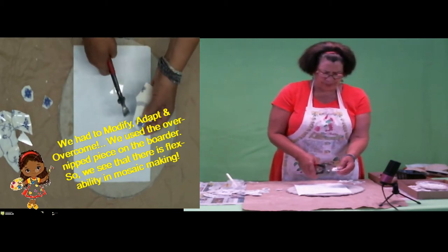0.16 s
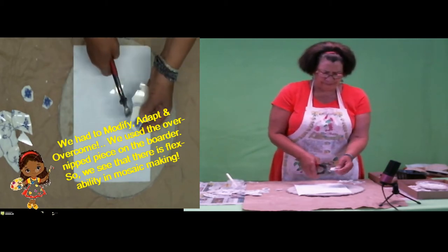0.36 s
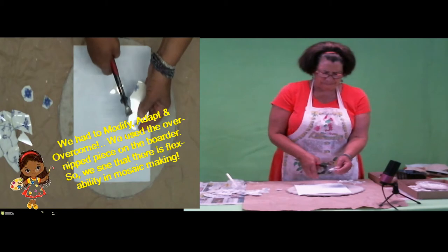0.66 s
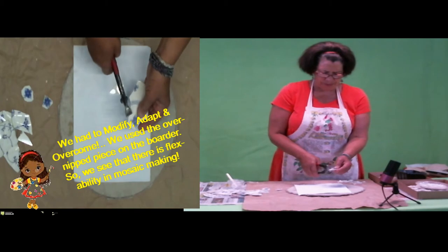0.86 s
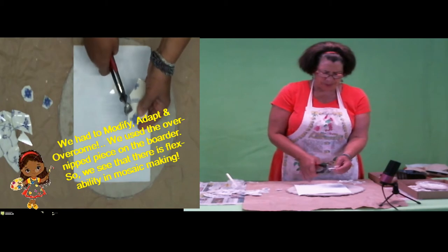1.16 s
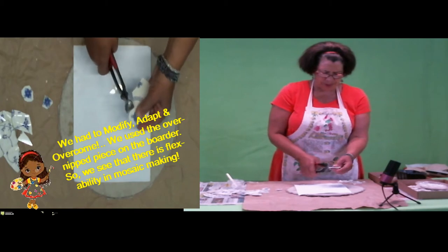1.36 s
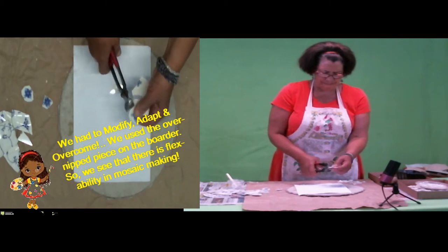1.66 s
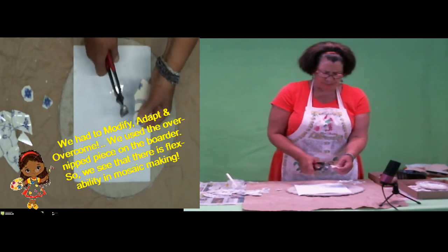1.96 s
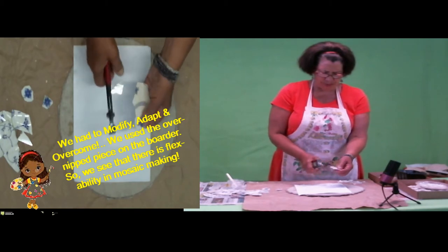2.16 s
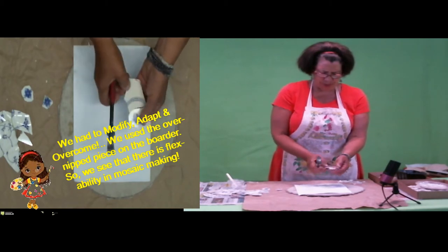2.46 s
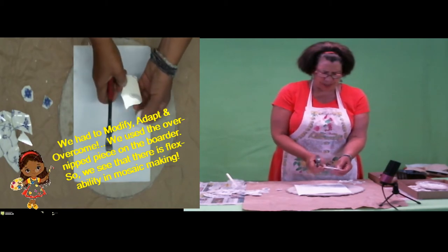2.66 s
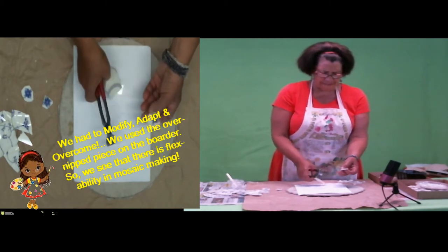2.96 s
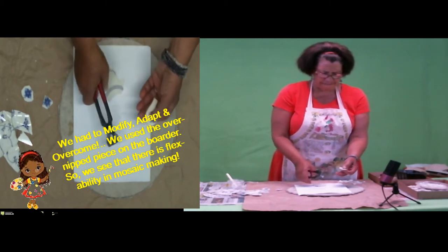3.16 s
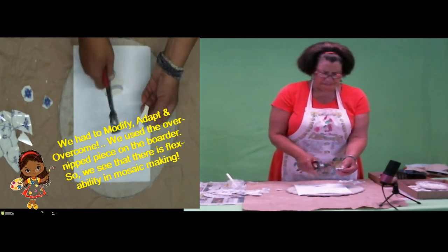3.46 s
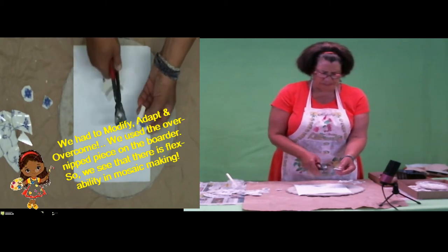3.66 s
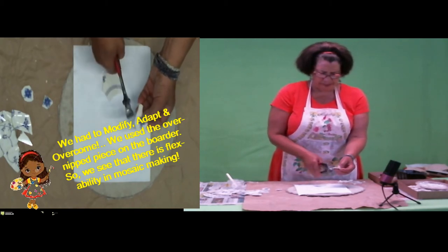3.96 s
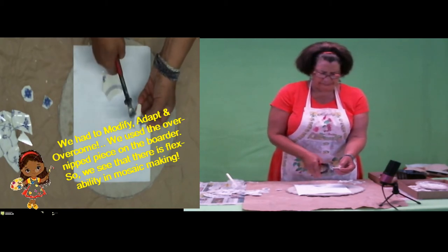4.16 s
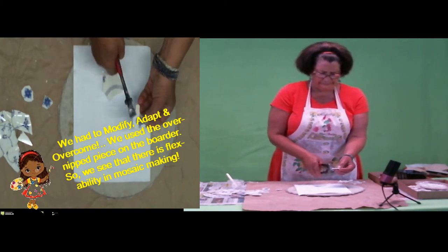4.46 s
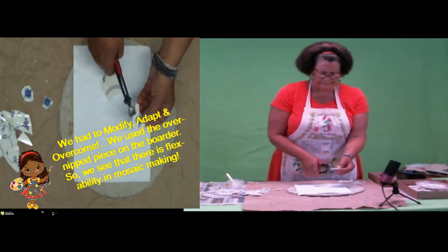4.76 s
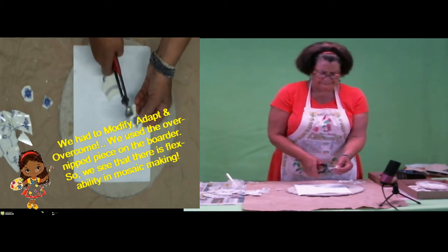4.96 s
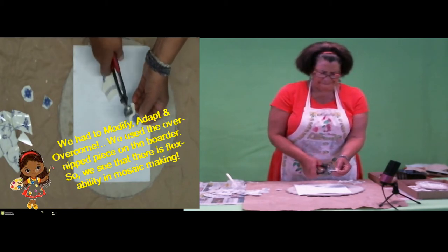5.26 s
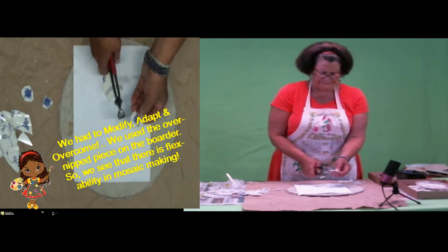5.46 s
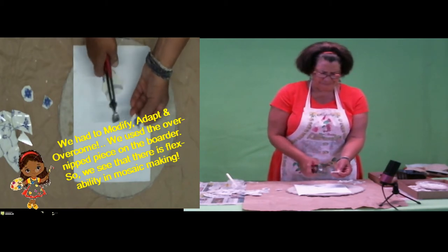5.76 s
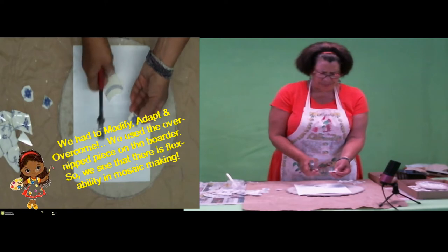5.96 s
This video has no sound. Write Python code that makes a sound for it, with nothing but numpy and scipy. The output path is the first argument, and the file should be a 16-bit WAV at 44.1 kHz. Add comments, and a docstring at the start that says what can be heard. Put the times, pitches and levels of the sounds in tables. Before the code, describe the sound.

Steel hand nippers work on china, heard close up in a small room. Faint ticks and a tiny scrape come at about 0.4 and 0.8 seconds. From 1.4 seconds the jaws grind with a thin, high squeak and dense crackling, ending in a loud snap at 1.8 seconds with a steel clink, a dull table bump and crumbs scattering on paper. Small clicks follow until 2.5 seconds. At 3.2 seconds a second sharp snap briefly rings a plate, followed by light clinks, chips and soft low bumps. A small gritty bite sounds at 4.6 seconds. More squeaky crackling starts at 5.1 seconds and breaks into a third loud snap at 5.5 seconds, with a bump and falling bits ticking until 6 seconds. Underneath, very faint room noise throbs about nine times a second, swelling at each big snap and sinking away.

```python
"""Hand nippers nibble and snap pieces of china over a sheet of paper in a small room.
The jaws grind with grit and a climbing squeak, and the glaze cracks in bursts that ring the gripped
piece. As pieces break off, the steel tool clinks, dull bumps pass through the table and crumbs
scatter on the paper; one knock rings a plate. Behind it all a soft room noise throbs about nine
times a second, swelling at each big snap and sinking away again."""
import sys
import numpy as np
from scipy import signal
from scipy.io import wavfile
from scipy.ndimage import uniform_filter1d, minimum_filter1d

SR = 44100
rng = np.random.default_rng(int(sys.argv[2]) if len(sys.argv) > 2 else 0)


def master_out(mix):
    """Clip the mix to full scale and print it as 16-bit PCM to the path in sys.argv[1]."""
    frames = np.transpose(np.atleast_2d(mix))
    ceiling = np.clip(frames, -1, 1)
    pcm = np.round(ceiling * 32767).astype(np.int16)
    wavfile.write(sys.argv[1], SR, pcm)


N = 269671

# Room noise bands: low_hz, high_hz, base_dip_db, throb_share, patchiness_db,
# crest_length (-1 short to 1 long), top_db, sink_db, sink_exponent, floor_db
NOISE_BANDS = [(200, 430, 20, .1, 4, -0.04, -68.5, 25, 1.6, -93.5),
               (283, 540, 19.5, .1, 3.5, -0.11, -64.5, 19.5, 1.4, -88),
               (482, 570, 14, 0.26, 6.5, -0.13, -62, 19, 0.98, -92),
               (604, 910, 9, 0.76, 4.5, -0.081, -60.5, 9, 1.5, -83),
               (930, 1650, 4.5, 0.59, 3.5, 0.24, -60, 5.5, 1.6, -80.5),
               (1680, 2900, 1, 0.48, 3.5, .3, -61, 4, 1.5, -79),
               (2990, 4800, -2, .7, 3, .4, -64, 1.5, 2.2, -76),
               (4950, 24000, -1, .7, 2.5, 0.2, -65, 5.5, .9, -78)]
# Room noise swells: start_s, level_db, hump_hz, hump_db, sink_pace_per_s, first_depth_db,
# depth_growth_db_per_s, extra_crest_length
NOISE_SWELLS = [(-.05, -1.97, 520, 7.5, 1.07, 5.5, 8, 0.62), (1.839, -0.3, 370, 12.5, .95, 3.5, -1, -.25),
                (3.23, -2, 798, 11.5, 0.94, 3.5, 11.5, 0.41), (5.469, -1.9, 305, 10.5, 0.68, 0, 8.5, .05)]
# Tone of the room noise: frequency_hz, gain_db
NOISE_EQ = [(200, -0.5), (1800, 3), (3400, 1), (4500, -4), (4900, -8), (6000, -5.5), (8100, -8),
            (12000, -11.5), (16000, -24.5)]
# A wavering hum: pitch_hz, width_hz, level_db
ROOM_HUM = (355, 20, -77.5)
# Steady rumble: low_hz, high_hz, level_db
RUMBLE_BANDS = [(30, 49, -95.5), (117, 280, -83)]
# Cracks in the china: start_s, level_db, ring_hz, ring_db, middle_db, treble_db
# (the last three are sends, relative to level_db)
CRACK_HITS = [(0.3792, -39, 6870, -4.5, -42, -3.5), (0.7672, -44, 7000, -4.5, -10, -6),
              (0.8286, -37.5, 7070, -1.5, -7.5, -0.5), (1.4457, -18.5, 11150, 2, -60, 2),
              (1.4603, -16.5, 11130, 8.5, -60, -15), (1.497, -16.5, 11200, -5, -50, -11),
              (1.5176, -23, 11400, 1, -51, -15), (1.5252, -19, 7570, -1, -42, -14),
              (1.5351, -18.5, 11320, -0.5, -60, -10), (1.5513, -25, 5640, -2, -60, 4),
              (1.576, -30.5, 8400, 7.5, -42, -10), (1.5941, -21, 3220, -13, -54, -3),
              (1.6016, -16, 9700, -22, -37, 2), (1.616, -7.5, 9360, -7, -36, -20),
              (1.6308, -1, 5260, -11.5, -69, -5.5), (1.6835, -1, 7300, -3, -50, -0.5),
              (1.7332, -23, 9700, -7, -41, -13), (1.7939, -13.5, 7200, -9, -26, 6),
              (1.799, -4, 7040, -5, -23.5, 2), (1.814, -21.5, 7350, -22, 4, 6),
              (1.821, -8.5, 7500, -11, -31, 3), (1.83, 2.5, 10000, -26, -7, 0),
              (1.833, 9.5, 10350, -24, -19, -25), (1.925, -13.5, 4330, -19, -19.5, -7),
              (1.9518, -17.5, 5800, -19, -36, -2), (1.995, -3.5, 2530, -9.5, -16, -3.5),
              (2.0976, -25, 3400, -3, -4, -2), (2.144, -34, 3030, -3, -14, 2),
              (2.168, -25, 9350, -14, -17, -1), (2.2364, -34, 3180, -7, -29.5, -2),
              (2.3884, -39, 4020, -21.5, -19, -8), (3.0754, -21, 9950, -11, -22.5, -27.5),
              (3.217, 4.5, 3160, -1, -12, -3.5), (3.2206, 4, 3280, -6, -9.5, -19),
              (3.23, -7.5, 3540, 6, -1, -20), (3.4471, -37, 3380, -8, -10, -5),
              (4.594, -36.5, 7550, -5.5, -38, -4.5), (4.6318, -29, 7650, -3.5, -46.5, -6.5),
              (5.1417, -37, 6370, -10, -25.5, -10.5), (5.1703, -28, 6580, -9.5, -31.5, -5.5),
              (5.1822, -15.5, 6760, -3, -42.5, -6), (5.1948, -17, 6860, 2, -41, -20),
              (5.264, -31.5, 7100, 9, -58.5, -26.5), (5.3491, -24, 7060, 13, -47, 8),
              (5.458, 11.5, 6470, -30, -19, -28), (5.4636, -2, 6700, -13, -7.5, -0.5),
              (5.4668, 0.5, 6470, -5.5, -25, -29), (5.539, -18.5, 7100, -13, -29, -4),
              (5.553, -20, 3600, -6.5, -26, -1), (5.604, -11.5, 4800, -8.5, -16, -18),
              (5.6532, -20, 5230, -12, -32, -1.5), (5.747, -35, 6540, -23, -23, 1),
              (5.814, -24.5, 6800, -25, -11, -14), (5.8597, -34, 5300, -7, -5.5, -2),
              (5.91, -38, 2600, -18, -7.5, -15), (6.0344, -35, 5530, -16.5, -22.5, -1)]
# Tone of a crack's core: frequency_hz, gain_db
CRACK_EQ = [(1350, -37), (2300, -15), (3780, -0.5), (4540, -8.5), (5200, -1), (6840, -9), (7450, -4.5),
            (9000, -7), (11700, -41), (19800, -120)]
# Modes of the gripped china: pitch_hz, gain_db, t60_s
CHINA_MODES = [(2818, -0.5, 0.01), (3255, 1.5, 0.027), (5550, -3.5, 0.05), (7120, -6, 0.013),
               (10100, -3.5, 0.04), (10500, -3.5, 0.011)]
# Grinding of the jaws, one envelope per bite: time_s, level_db
BITE_ENVELOPES = [
    [(.8, -89), (.84, -52.5), (.885, -71)],
    [(.885, -66), (.92, -65), (.97, -90)],
    [(1.27, -66.5), (1.36, -74), (1.43, -62.5), (1.46, -48), (1.55, -45), (1.6, -53), (1.65, -38.5),
     (1.71, -39.5), (1.8, -56)],
    [(4.5, -74), (4.57, -71.5), (4.64, -51), (4.67, -68), (4.71, -78.5)],
    [(5.12, -76), (5.17, -61), (5.21, -43.5), (5.25, -74), (5.3, -56.5), (5.34, -72), (5.37, -63.5),
     (5.46, -65)],
]
# Squeak of each bite: start_hz, climb_hz_per_s, gain_db (relative to the envelope)
BITE_SQUEAKS = [(7100, 490, -6), (10350, 30, 5.5), (10870, 1500, -6), (7650, 1300, 6), (7000, 2000, 7)]
# Partials of the squeak: pitch_ratio, gain_db
SQUEAK_TONES = [(0.52, -15), (1.0, 0), (1.7, -12.5), (2.0, -11.5)]
# Tone of the grit: frequency_hz, gain_db
GRIT_EQ = [(1530, -45), (2600, -20.5), (3290, -6.5), (4530, -20.5), (4890, -2), (6140, -14.5), (7420, 3),
           (9330, -5), (11500, -11.5), (16000, -20)]
# Dull bumps through the table: start_s, level_db, pitch_hz, t60_s
TABLE_BUMPS = [(1.828, -30.5, 320, 0.099), (1.833, -27, 448, 0.051), (3.3, -48.5, 54.4, 0.37),
               (3.45, -60.5, 45, .2), (3.55, -62, 50.1, 0.24), (3.72, -66, 80, 0.11),
               (4.65, -59, 150, 0.12), (4.758, -55, 150, .13), (5.461, -25.5, 276.2, 0.063),
               (5.464, -30, 433, 0.058), (5.462, -40.5, 171, 0.15), (5.535, -39, 59, 0.44),
               (5.658, -50, 48.7, 0.59), (5.8, -57, 60, 0.27)]
# Clinks of the tool: start_s, level_db, centre_hz, spread_octaves
TOOL_HITS = [(1.829, -1, 9930, 0.15), (2.1634, -28.5, 9800, 0.1), (2.184, -17, 6420, 0.081),
             (2.474, -38.5, 7230, 0.5), (2.4828, -27, 7580, 0.8), (2.493, -26, 7530, 0.18),
             (3.0772, -25, 9640, 0.6), (3.266, -25.5, 9800, 0.1), (3.29, -20, 6460, 0.05),
             (5.8136, -38, 5370, 0.5), (3.22, -11, 7160, 0.9)]
# Modes of the steel tool: pitch_hz, gain_db, t60_s
STEEL_MODES = [(5500, -15, 0.069), (5870, -11, 0.054), (6462, 0, 0.047), (7250, -4, .07),
               (8600, -15.5, .06), (9830, 1.5, 0.09), (13480, -6.5, 0.09)]
# Crumbs and shards landing on the paper: start_s, level_db, hold_s, fall_db_per_s
CRUMB_SHOWERS = [(1.83, -41, 0.13, 67), (3.223, -40.5, 0.074, 259), (5.455, -36, 0.015, 197),
                 (5.474, -45, .1, 57), (5.577, -40.5, 0.0074, 152), (5.59, -32, 0.015, 502)]
# Tone of the crumbs: frequency_hz, gain_db
CRUMB_EQ = [(530, -37), (900, -8), (1160, -22), (1980, -2), (2450, -7), (6420, -4.5), (15500, -14.5)]
# The rattling blow on the plate: start_s, drive_db, t60_s
PLATE_HIT = (3.2215, -7, 0.0099)
# Modes of the plate on the table: pitch_hz, gain_db, t60_s
PLATE_MODES = [(672, -6, 0.083), (802.3, -11.5, 0.13), (856, -9, 0.098), (1344, -7.5, .05),
               (1950, -12.5, 0.048), (2170, 0.5, 0.06), (3236.5, -0.5, 0.088), (3295, -7.5, 0.019),
               (3590, -7.5, 0.044), (3596, -6, 0.06), (6030, -7.5, 0.12), (4160, -9.5, 0.058),
               (4270, -1, .04), (5180, 1, 0.039)]
# Slaps off nearby surfaces: delay_s, gain_db
EARLY_ECHOES = [(.0085, -14), (.017, -26), (.026, -28)]
# Decay of the room's tail: frequency_hz, t60_s
TAIL_DECAY = [(300, 0.22), (1000, 0.092), (4000, 0.16), (10000, 0.12), (16000, 0.14)]

THROB_HZ, FIRST_CREST_S, MAX_DEPTH_DB = 9.375, .027, 23
LONGEST_CREST, CREST_LOSS_PER_DB = .75, 0.02   # deeper throbs have shorter crests
HUMP_OCTAVES, FLARE_DB, FLARE_S = .3, 4, .04
CRACK_T60_S, SCATTER_RISE_S = 0.013, .012
TAIL_DB, CUTOFF_HZ = -11.5, 16600


def amp(db):
    return 10 ** (np.asarray(db) / 20)


def unit(x):
    return x / np.sqrt(np.mean(x ** 2) + 1e-20)


def at_hz(curve, hz):
    points_hz, values = np.transpose(curve)
    return np.interp(np.log(hz), np.log(points_hz), values)


def add(out, start_s, x):
    i = round(start_s * SR)
    out[i:i + len(x)] += x[:N - i]


def band(x, low_hz, high_hz, order=2):
    sos = signal.butter(order, [low_hz, min(high_hz, .45 * SR)], "band", fs=SR, output="sos")
    return signal.sosfilt(sos, x)


def high_pass(x, hz):
    return signal.sosfilt(signal.butter(8, hz, "high", fs=SR, output="sos"), x)


def equalise(x, curve):
    """Twelve bands of alternating polarity, each at the curve's gain."""
    edges = np.geomspace(curve[0][0], curve[-1][0], num=13)
    return sum(amp(at_hz(curve, np.sqrt(low * high))) * band(x, low, high) * (-1) ** k
               for k, (low, high) in enumerate(zip(edges, edges[1:])))


def ring(drive, hz, t60):
    """One mode: a unit click starts a dying sine of height 1."""
    r, w = amp(-60 / (t60 * SR)), 2 * np.pi * hz / SR
    return signal.lfilter([0, np.sin(w)], [1, -2 * r * np.cos(w), r * r], drive + 1e-18)


def resonate(drive, modes, drive_db=0):
    return sum(amp(gain_db + drive_db) * ring(drive, hz, t60) for hz, gain_db, t60 in modes)


def drift(rate_hz):
    """Smooth random modulation, rms about 1."""
    r = np.exp(-80 * np.pi * rate_hz / SR)
    slow = signal.lfilter([1], [1, -2 * r, r * r], rng.standard_normal(N // 40 + 2002))[2000:]
    return np.interp(np.arange(N) / 40, np.arange(len(slow)), unit(slow))


def grains(per_s, spread_db):
    """Random clicks of very uneven size, rms 1."""
    sizes = amp(spread_db * np.minimum(rng.exponential(1, N), 4)) * rng.choice([-1, 1], N)
    return unit(sizes * (rng.random(N) < per_s / SR))


def room_noise():
    """A patchy noise bed swells, sinks and throbs with sharp dips, over a hum and a rumble."""
    t = np.arange(N) / SR
    swells = np.array(NOISE_SWELLS)
    current = swells[np.maximum(np.searchsorted(swells[:, 0], t) - 1, 0)]
    start_s, swell_db, hump_hz, hump_db, pace, first_db, growth, extra_crest = current.T
    age_s = np.maximum(t - start_s, 0)
    depth_db = np.minimum(first_db + growth * age_s, MAX_DEPTH_DB)
    swell_db = swell_db + FLARE_DB * np.exp(-age_s / FLARE_S)
    throb = np.cos(2 * np.pi * THROB_HZ * (t - FIRST_CREST_S))
    hum_hz, width_hz, hum_db = ROOM_HUM
    hum_level = amp(hum_db + 2.8 * drift(10) + 5.5 * throb)
    out = hum_level * unit(band(rng.standard_normal(N), hum_hz - width_hz / 2, hum_hz + width_hz / 2))
    for low_hz, high_hz, level_db in RUMBLE_BANDS:
        out += amp(level_db) * unit(band(rng.standard_normal(N), low_hz, high_hz))
    for low_hz, high_hz, dip_db, share, patchy_db, crest, top_db, sink_db, bend, floor_db in NOISE_BANDS:
        octaves_off = np.log2(np.sqrt(low_hz * high_hz) / hump_hz)
        boost_db = hump_db * np.exp(-.5 * (octaves_off / HUMP_OCTAVES) ** 2)
        level = amp(top_db + swell_db + boost_db - sink_db * (pace * age_s) ** bend) + amp(floor_db)
        crest_now = np.minimum(crest + extra_crest - CREST_LOSS_PER_DB * depth_db, LONGEST_CREST)
        dip = .5 - .5 * np.tanh(6 * (throb + crest_now))
        edges = np.geomspace(low_hz, high_hz, num=8)
        white = rng.standard_normal((2, N))
        strips = np.zeros(N)
        for k, (low, high) in enumerate(zip(edges, edges[1:])):   # each strip comes and goes on its own
            strip_db = at_hz(NOISE_EQ, np.sqrt(low * high)) + patchy_db * drift(9)
            strips += amp(strip_db) * band(white[k % 2], low, high, order=3)
        out += level * amp(-(dip_db + share * depth_db) * dip) * unit(strips)
    return out


def china_cracks():
    """Each crack is a tight noise burst that rings the gripped piece; deep ones reach lower."""
    t = np.arange(SR // 8) / SR
    attack = np.sin(np.pi / 2 * np.minimum(t / 0.0025, 1)) ** 2
    envelope = 0.55 * attack * amp(-60 * t / CRACK_T60_S)
    core, treble, middle, pings = np.zeros((4, N))
    for start_s, level_db, ring_hz, ring_db, middle_db, treble_db in CRACK_HITS:
        burst = amp(level_db) * envelope * rng.standard_normal(len(t))
        add(core, start_s, burst)
        add(treble, start_s, amp(treble_db) * burst)
        add(middle, start_s, amp(middle_db) * burst)
        ping = ring(burst, ring_hz, t60=.012) + ring(burst, 1.02 * ring_hz, t60=.012)
        add(pings, start_s, amp(level_db + ring_db) * ping / np.max(np.abs(ping)))
    snap = amp(11) * equalise(core, CRACK_EQ) + amp(11.5) * band(treble, 9000, 14200, order=4)
    ringing = pings + resonate(core, CHINA_MODES, drive_db=-26)
    body = amp(20) * band(middle, 900, 2700, order=4)
    return high_pass(snap + ringing, 2700) + body


def jaw_grind():
    """Dense grit keeps the china ringing, and a rough squeak climbs as the grip tightens."""
    grit = unit(equalise(grains(per_s=5000, spread_db=4), GRIT_EQ))
    grit = high_pass(grit + resonate(grit, CHINA_MODES, drive_db=-26.5), 2600)
    roughness = amp(4.7 * drift(40)) * (drift(320) + 1j * drift(320))   # shakes level and phase
    out, t = np.zeros(N), np.arange(N) / SR
    for (start_hz, climb, squeak_db), envelope in zip(BITE_SQUEAKS, BITE_ENVELOPES):
        times_s, levels_db = np.transpose(envelope)
        bite = (t > times_s[0]) & (t < times_s[-1])
        age_s = np.arange(bite.sum()) / SR
        phase = 2 * np.pi * (start_hz + climb * age_s / 2) * age_s
        squeak = sum(amp(gain_db) * np.real(roughness[bite] * np.exp(1j * ratio * phase))
                     for ratio, gain_db in SQUEAK_TONES if ratio * start_hz < CUTOFF_HZ)
        level = amp(np.interp(t[bite], times_s, levels_db))
        out[bite] += level * (grit[bite] + amp(squeak_db) * squeak)
    return out


def table_bumps():
    """Soft pushes through the table: low noise that swells and dies."""
    out, t = np.zeros(N), np.arange(SR // 2) / SR
    for start_s, level_db, hz, t60 in TABLE_BUMPS:
        push = unit(band(rng.standard_normal(2 * len(t)), .75 * hz, 1.5 * hz, order=4)[len(t):])
        attack = np.sin(np.pi / 2 * np.minimum(t * hz / 1.5, 1)) ** 2
        add(out, start_s, amp(level_db - 60 * t / t60) * attack * push)
    return out


def tool_clinks():
    """Where the steel is touched decides which modes ring; each is a close, beating pair."""
    start_s, level_db, centre_hz, spread_octaves = np.transpose(TOOL_HITS)
    onsets = np.round(start_s * SR).astype(int)
    out = np.zeros(N)
    for hz, gain_db, t60 in STEEL_MODES:
        off_centre_db = 7.6 * (np.log2(hz / centre_hz) / spread_octaves) ** 2
        clicks = np.zeros(N)
        clicks[onsets] = amp(level_db + gain_db - off_centre_db - 6.5)
        out += ring(clicks, hz, t60) + 0.24 * ring(clicks, 1.008 * hz, 0.19 * t60)
    return high_pass(out, 2500)


def crumb_scatter():
    """Chips of china patter on the paper: a quick rise, a hold, a steady fall."""
    chips = unit(equalise(grains(per_s=1200, spread_db=4.5), CRUMB_EQ))
    envelope, t = np.zeros(N), np.arange(N) / SR
    for start_s, level_db, hold_s, fall in CRUMB_SHOWERS:
        rise = np.clip((t - start_s) / SCATTER_RISE_S, 0, 1)
        envelope += rise * amp(level_db - fall * np.maximum(t - start_s - hold_s, 0))
    return chips * envelope


def plate_knock():
    """A rattling blow feeds every mode of the plate for a moment."""
    start_s, drive_db, t60 = PLATE_HIT
    age_s = np.maximum(np.arange(N) / SR - start_s, 0)
    rattle = amp(drive_db - 14.5 - 60 * age_s / t60) * (age_s > 0) * rng.standard_normal(N)
    return high_pass(resonate(rattle, PLATE_MODES), 590)


def small_room(x):
    """Adds a few near echoes and a dense tail that dies band by band."""
    t, edges = np.arange(SR // 3) / SR, np.geomspace(150, 17000, num=10)
    tail = np.zeros(len(t))
    for low, high in zip(edges, edges[1:]):
        t60 = at_hz(TAIL_DECAY, np.sqrt(low * high))
        tail += band(rng.standard_normal(len(t)), low, high) * amp(-60 * t / t60)
    response = amp(TAIL_DB) * unit(tail * np.minimum(t / 0.002, 1)) / np.sqrt(len(t))
    for delay_s, gain_db in EARLY_ECHOES:
        response[round(delay_s * SR)] += amp(gain_db)
    return x + signal.fftconvolve(x, response)[:N]


def scene():
    """Mono mix: the bright close-up sounds feed the room; bumps and noise bed stay dry."""
    close_up = china_cracks() + tool_clinks() + plate_knock() + crumb_scatter() + jaw_grind()
    return (small_room(close_up) + table_bumps() + room_noise())[None]


def record(dry):
    """A fast limiter holds the loudest snaps; a steep low-pass trims the top."""
    window = SR // 1200
    needed_gain = np.minimum(1, .99 / (np.abs(dry) + 1e-9))
    held_gain = minimum_filter1d(needed_gain, size=2 * window)
    limited = dry * uniform_filter1d(held_gain, size=window)
    return signal.sosfilt(signal.cheby2(14, 70, CUTOFF_HZ, fs=SR, output="sos"), limited)


dry = scene()
out = record(dry)
master_out(out)
```